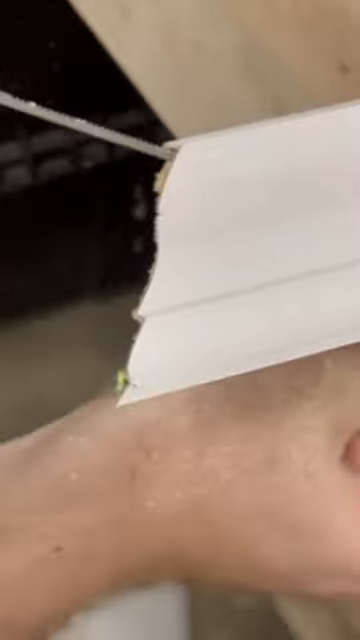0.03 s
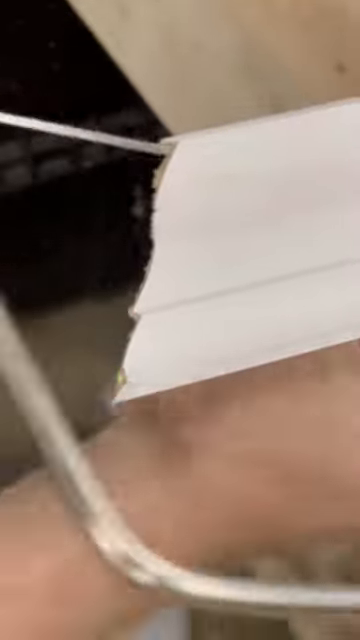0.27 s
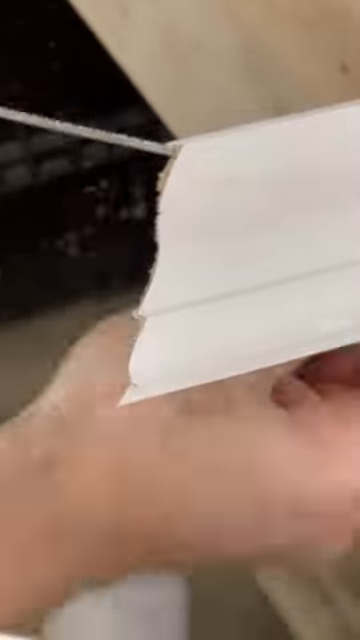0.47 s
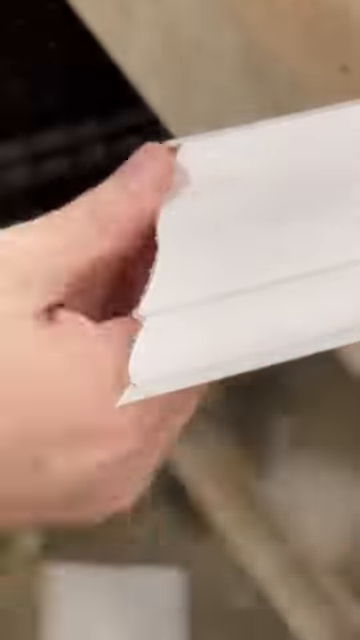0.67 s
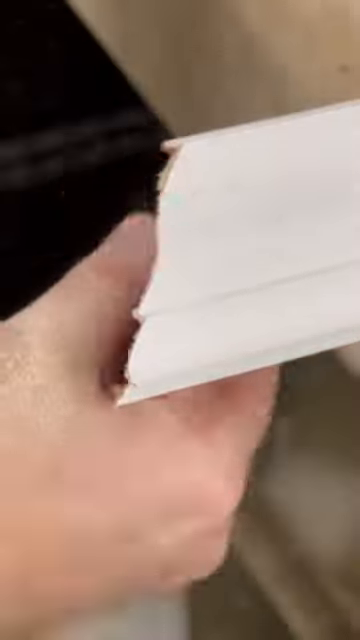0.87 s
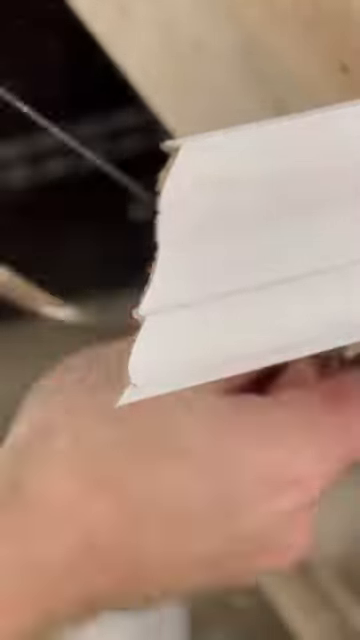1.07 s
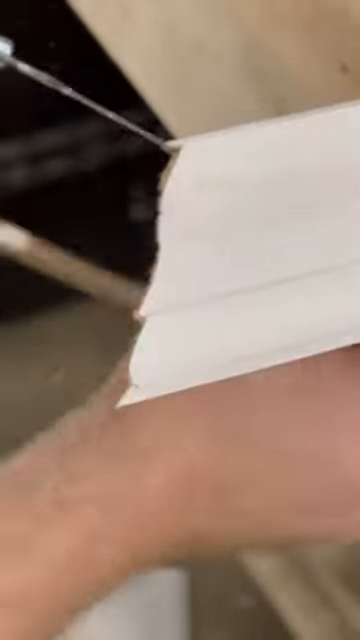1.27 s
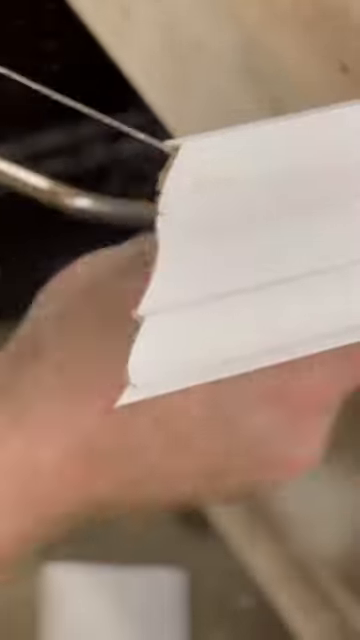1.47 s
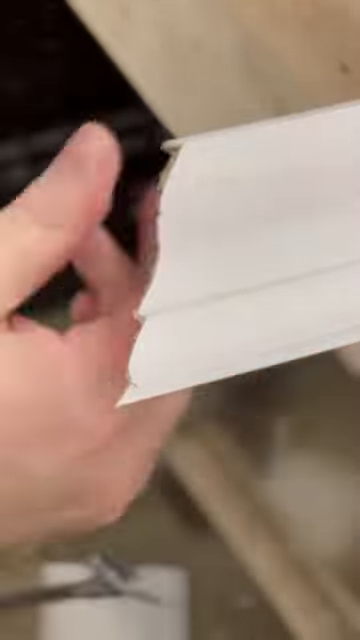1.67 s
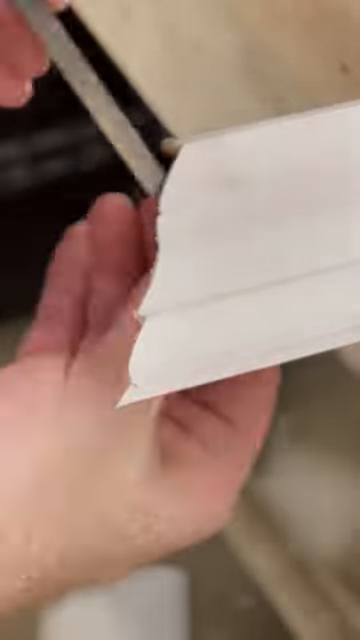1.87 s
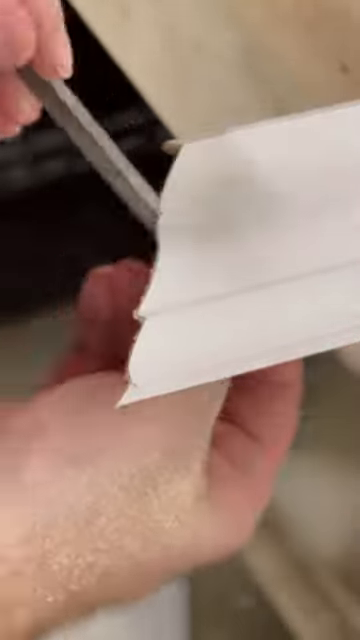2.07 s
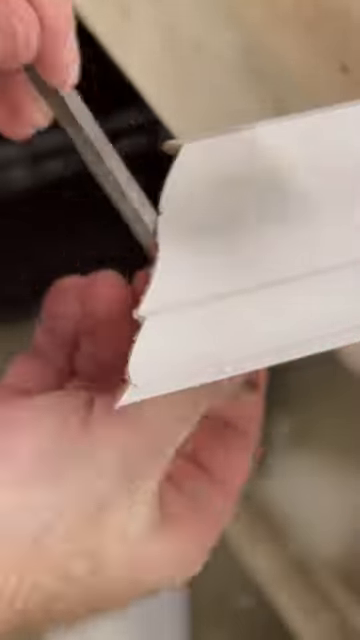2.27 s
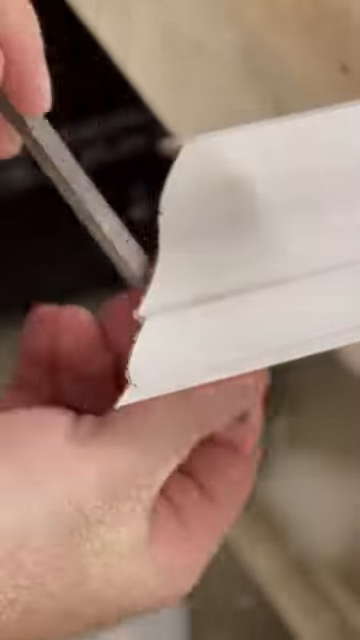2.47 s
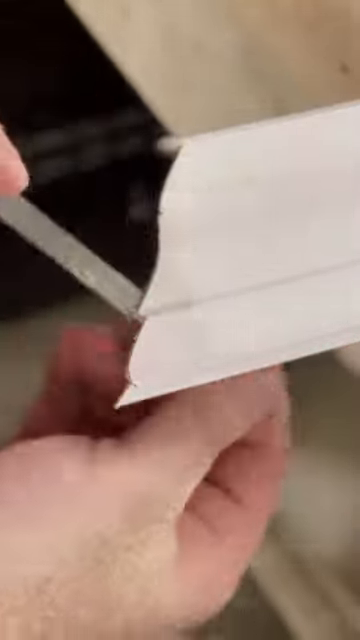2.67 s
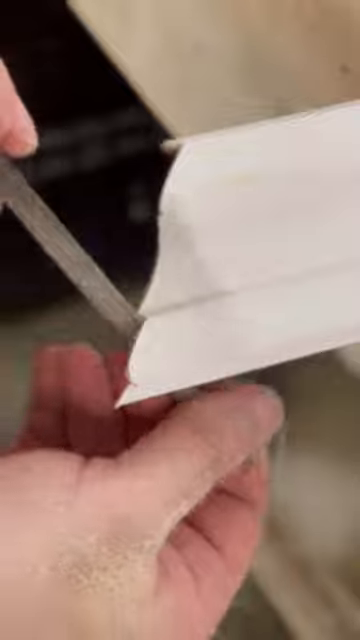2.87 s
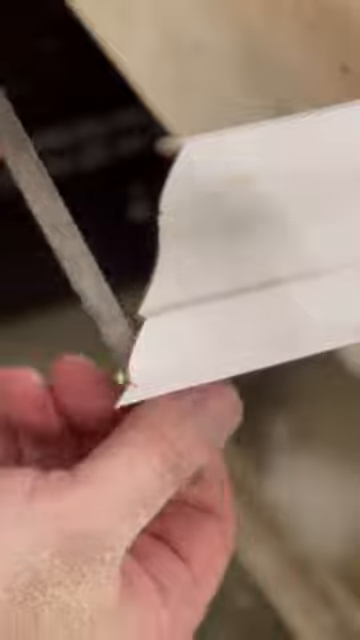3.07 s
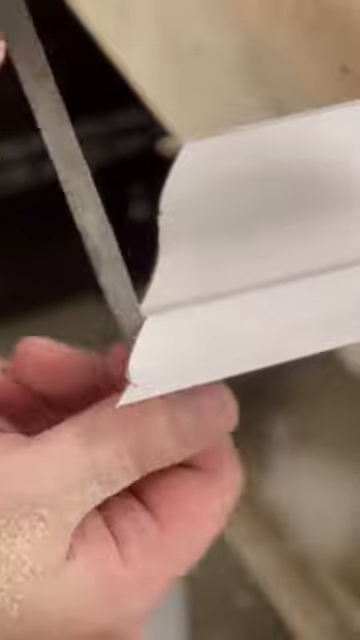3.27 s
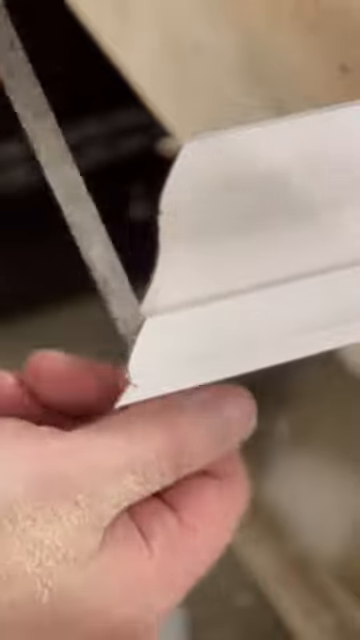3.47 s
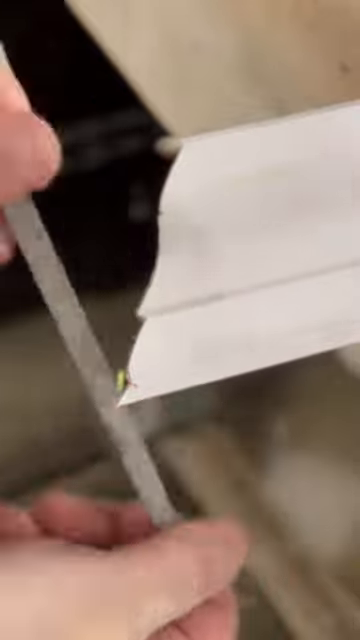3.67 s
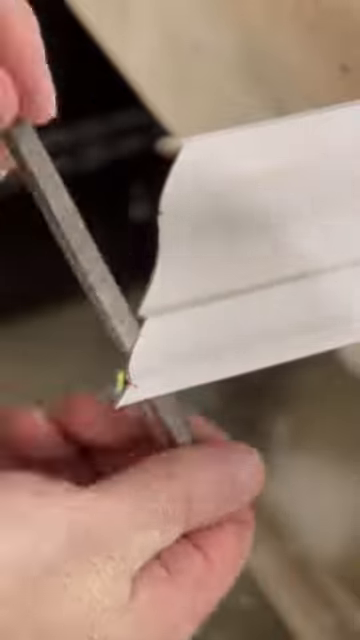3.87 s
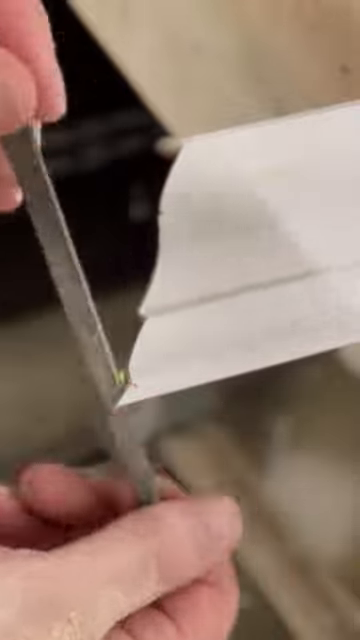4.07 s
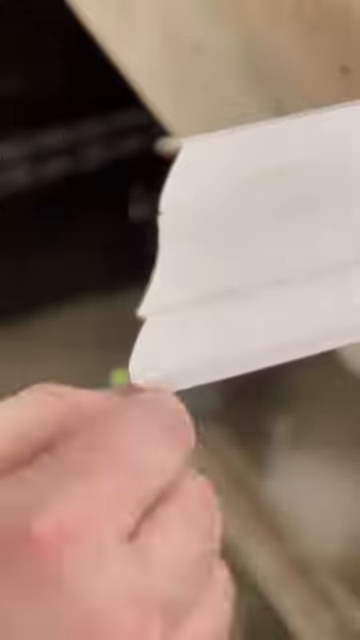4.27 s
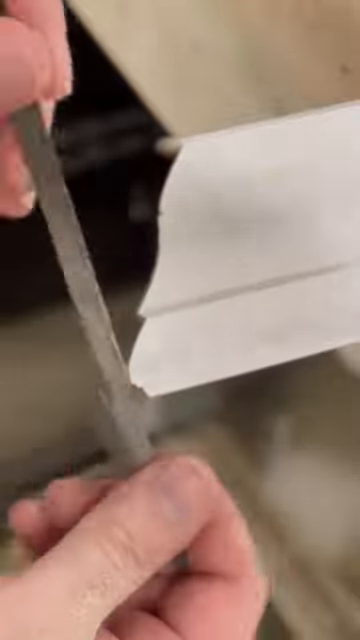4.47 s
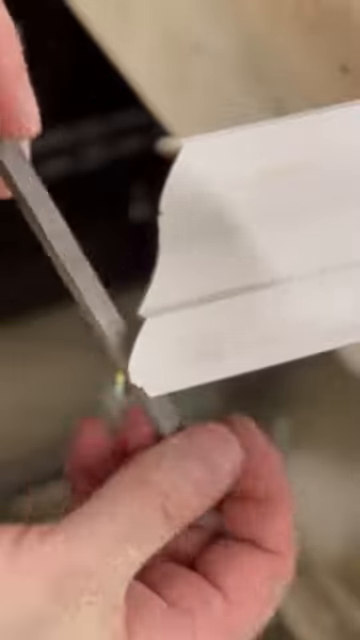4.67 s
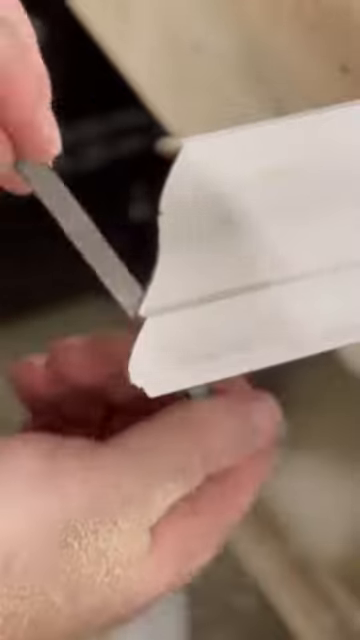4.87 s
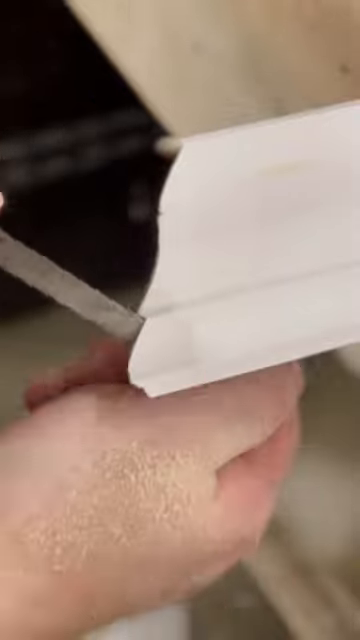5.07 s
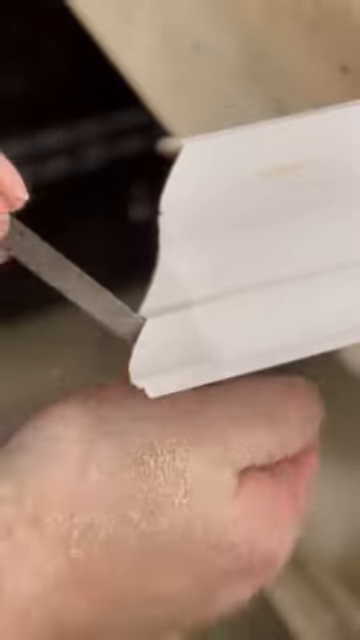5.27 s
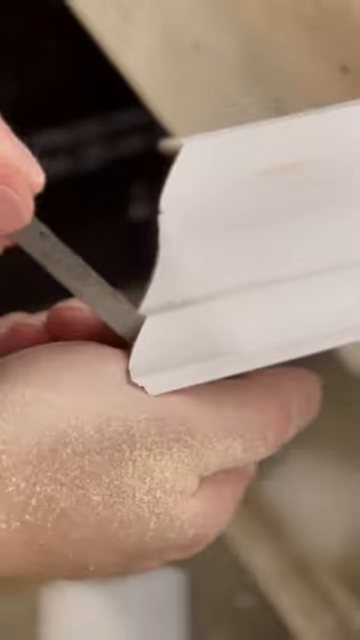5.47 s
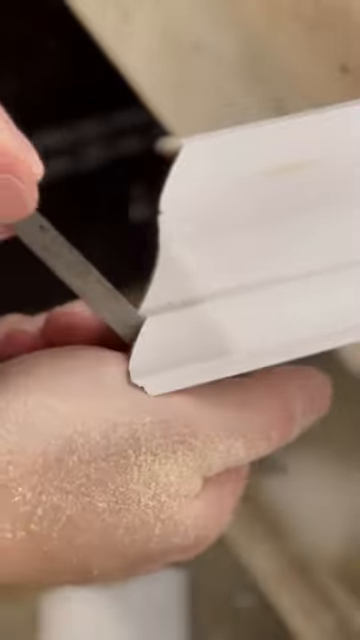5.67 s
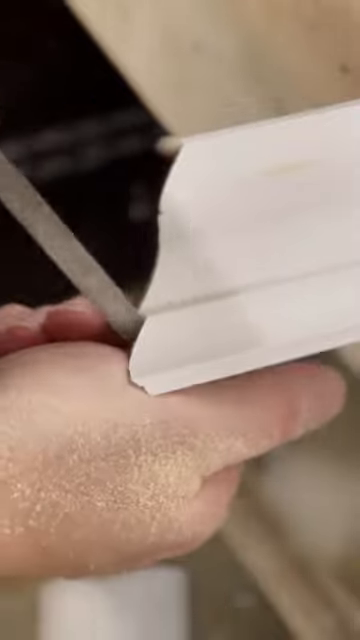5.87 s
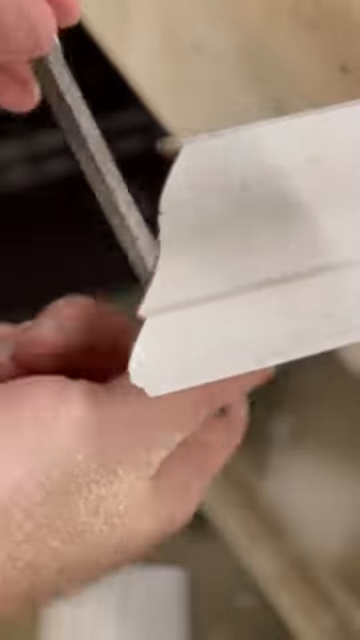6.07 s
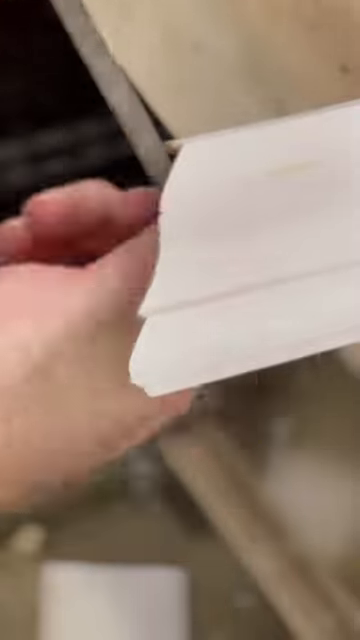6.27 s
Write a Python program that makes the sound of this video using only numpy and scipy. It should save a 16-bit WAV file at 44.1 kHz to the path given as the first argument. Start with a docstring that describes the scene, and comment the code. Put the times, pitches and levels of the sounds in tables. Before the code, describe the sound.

Very fast, quiet saw strokes rasp on wood, an offcut snaps, then a click, a fan's rush and much louder, rapid, irregular filing.

```python
"""Close to a phone in a quiet workshop, a coping saw works the end of a wooden moulding, in a time-lapse,
sped up with its pitch kept, so that the strokes follow one another very quickly. An offcut snaps off, fingers
brush the wood in a pause, and the saw bites again. Then a switch clicks, a fan starts to blow and a file takes
over. Each bite is a short swell of rough noise that shakes the board's resonances; rubs and clicks are such
swells too. Room and fan are steady noise, shaped by pitch."""
import sys
import numpy as np
from scipy.fft import rfft, irfft, next_fast_len
from scipy.io import wavfile
from scipy.ndimage import uniform_filter1d

SR = 44100
rng = np.random.default_rng(int(sys.argv[2]) if len(sys.argv) > 2 else 0)


def bounce(signal):
    """Save signal as a 16-bit WAV file at the path given by the first command-line argument."""
    frames = np.transpose(np.atleast_2d(signal))
    limited = np.clip(frames, -1, 1)
    pcm = np.round(limited * 32767).astype(np.int16)
    wavfile.write(sys.argv[1], SR, pcm)


N = 278712


def amp(db):
    """Turns decibels into gain."""
    return 10 ** (np.asarray(db) / 20)


def unit(x):
    """Scales each row to an rms of 1."""
    return x / np.sqrt(np.mean(x ** 2, axis=-1, keepdims=True) + 1e-20)


def along(points, hz):
    """Reads a curve of (frequency [Hz], value) points on a log frequency axis."""
    f, v = np.transpose(points)
    return np.interp(np.log(hz + 1), np.log(f + 1), v)


def level(rows):
    """Gain per sample of a (time [s], level [dB]) curve, practically silent outside it."""
    s, db = np.transpose(rows)
    return amp(np.interp(np.arange(N) / SR, s, db, left=-150, right=-150))


def filtered(x, response):
    """Filters x by a complex response of frequency."""
    n = x.shape[-1]
    padded = next_fast_len(n + 8192)
    spectrum = rfft(x, padded) * response(np.fft.rfftfreq(padded, 1 / SR))
    return irfft(spectrum, padded)[..., :n]


def modes(table):
    """Response of ringing resonances (frequency [Hz], width [Hz], level [dB]), with alternating signs."""
    def response(f):
        total = 0
        for k, (centre, width, db) in enumerate(table):
            resonance = 1j * f * width / (centre * centre - f * f + 1j * f * width)
            total = total + (-1) ** k * amp(db) * resonance
        return total
    return response


def confined(table):
    """A group of modes radiates poorly well below its lowest and above its highest member."""
    low, high = table[0][0] / 2, table[-1][0] * 2
    return lambda f: (1j * f / (low + 1j * f) * high / (high + 1j * f)) ** 2


def grit(shape, spread_db):
    """Noise whose samples differ widely in size, as when fibres tear."""
    draw = rng.random(shape + (2,))
    size = amp(-max(spread_db, 0) * np.log(draw[..., 1] + 1e-4))
    return (draw[..., 0] - .5) * size


RELEASE = 1.35  # a catch lets go this much faster than it would relax by itself


def bursts(times, swell, parts, spread_db, skirt_db):
    """Rough swells set groups of modes ringing; each group's loudest moment gets the peak level asked for.

    parts: (modes, peak [dB], build-up [s], lean to higher modes [dB per octave], extra rub [dB])
    """
    t = np.arange(SR // 5) / SR
    width = np.clip(swell, .001, .025)[:, None]
    since = t - .08  # time from the peak of the swell

    def swelling(u):
        """Starts at u = -1, peaks at 0 and dies away."""
        return np.clip(1 + u, 0, None) ** 3 * np.exp(-3 * u)

    tearing = grit((len(times), len(t)), spread_db)
    catch = swelling(since * np.where(since > 0, RELEASE, 1) / (1.98 * width)) * tearing
    # a light rub leads into and out of each catch
    rub = amp(skirt_db) * swelling((since - .0056) / 0.024) * tearing
    out = np.zeros(N + SR)
    for table, db, build_s, lean, rub_db in parts:
        # each contact point favours different modes
        favour = amp(3.46 * rng.standard_normal((len(times), len(table))))
        octaves = np.log2([m[0] for m in table])
        favour = favour * amp(np.outer(lean, octaves - octaves.mean()))

        def response(f):
            each = np.array([(-1) ** k * modes([m])(f) for k, m in enumerate(table)])
            return confined(table)(f) * (favour @ each)

        ring = filtered(catch + amp(rub_db) * rub, response)
        # loudness over about 6 ms
        loudest = np.sqrt(uniform_filter1d(ring ** 2, size=260).max(axis=1))
        sound = ring * (amp(db) / loudest)[:, None]
        at = np.round((times - build_s) * SR).astype(int)[:, None] + np.arange(len(t))
        # half a second of spare room lets bursts begin before time zero
        at = at + SR // 2 - round(.08 * SR)
        out += np.bincount(at.ravel(), sound.ravel(), 2 * SR + N)[SR // 2:][:N + SR]
    return out[:N]


# How alike diffuse sound is on the left and right: (frequency [Hz], likeness [-1 to 1])
ALIKE = [(150, .99), (640, .5), (1400, .8), (2200, 1), (5800, 1), (8500, -.3), (10500, -1)]


def diffuse(x):
    """Mixes two unrelated signals into a stereo pair that is more or less alike at each frequency."""
    def mid_and_side(hz):
        turn = np.arccos(np.clip(along(ALIKE, hz), -1, 1)) / 2
        return np.array([np.cos(turn), np.sin(turn)])
    mid, side = filtered(x, mid_and_side)
    return np.array([mid + side, mid - side])


def rush(spectrum):
    """Steady stereo noise at rms 1, shaped by a (frequency [Hz], density [dB per Hz]) curve."""
    noise = rng.standard_normal((2, N))
    return unit(diffuse(filtered(noise, lambda hz: amp(along(spectrum, hz)))))


# Colour of the quiet room with a faint drone: (frequency [Hz], relative density [dB per Hz])
SHOP = [(20, 1), (90, -1.5), (320, -18.5), (355, -11), (395, -22), (1600, -26), (2200, -36), (15000, -53)]
SHOP_DB = -58


def room():
    """The room's low rumble is noise that is strongest at the bottom."""
    return amp(SHOP_DB) * rush(SHOP)


# Resonances of the moulding, low to high, all (frequency [Hz], width [Hz], relative level [dB])
BEND = [(158.7, 31, 0.5), (231.3, 52.4, 13.5)]
TWIST = [(385.5, 102, 2), (533.7, 92, 7), (609, 130, 4), (924, 460, -13)]
EDGE = [(1311, 165, 14.4), (1750, 400, 1.75)]
SCRATCH = [(2186, 380, 10), (2623, 370, 6.5), (3335, 252, 8), (5100, 325, -1.5), (6100, 3600, -10),
           (7500, 1060, -5), (9600, 6300, -23.5), (13300, 4600, -26)]
# Hiss of the thin blade's teeth: (frequency [Hz], width [Hz], relative level [dB])
BLADE = [(7600, 64000, 0)]
# Blade sliding in the cut: (time [s], level [dB])
DRAG = [(0, -37.5), (.07, -54.5), (.135, -66), (.17, -44.5), (.38, -42), (.405, -64), (.45, -41),
        (.58, -59), (.62, -100), (1.23, -100), (1.26, -47.5), (1.385, -62), (1.41, -44.5), (1.48, -50.5),
        (1.5, -51.5), (1.53, -49.5), (1.6, -54.5), (1.62, -90)]


def drag():
    """The blade slides over the fibres and excites the whole board."""
    force = grit((N,), spread_db=3.0)
    groups = [(BEND, -4), (TWIST[1:], -4), (EDGE, -8), (SCRATCH, -5), (BLADE, -15)]
    ringing = sum(amp(db) * unit(filtered(force, modes(table))) for table, db in groups)
    return level(DRAG) * unit(ringing)


# The saw's stroke rocks the bench: (frequency [Hz], width [Hz], relative level [dB])
FRAME = [(99, 37, 0)]
# Bites of the teeth: (time [s], strength [dB], edge ring over the board [dB], swell [s], about half the rise)
BITES = [(0.023, -35.5, -12.5, 0.0054), (0.055, -46.5, -8, 0.0078), (0.092, -41.5, -11.5, 0.0048),
         (0.178, -36, -15, 0.015), (0.218, -35.5, -14.5, 0.0041), (0.255, -34.5, -13, 0.01),
         (0.303, -35, -14.5, 0.0051), (0.336, -33.5, -9, 0.0036), (0.371, -35, -12.5, 0.0032),
         (0.417, -40, -13, 0.0018), (0.449, -36, -15, 0.0034), (0.491, -32, -17, 0.0041),
         (0.51, -32.5, -18, 0.015), (0.558, -45.5, -1.5, 0.0011), (1.267, -29.5, -15, 0.008),
         (1.322, -33.0, -20, 0.021), (1.405, -29, -8.5, 0.0028), (1.451, -32, -17, 0.011),
         (1.529, -27, -18, 0.0097), (1.556, -41, -14, 0.002), (1.59, -41.5, -14, 0.0027),
         (1.673, -26, -21.5, 0.0047), (2.01, -18.5, -16.5, 0.0066), (2.039, -18.5, -19.5, 0.0094),
         (2.067, -18, -16.5, 0.01), (2.11, -26.5, -14, 0.0086), (2.157, -29, -9.5, 0.0075),
         (2.184, -20.5, -20.5, 0.0072), (2.206, -14.5, -16, 0.0024), (2.241, -16.0, -15, 0.0024),
         (2.276, -27, -16, 0.0044), (2.303, -26.5, -10.5, 0.0085), (2.358, -23.5, -14.5, 0.0025),
         (2.379, -23.5, -11.5, 0.0079), (2.424, -21.5, -13, 0.0098), (2.463, -15.5, -8, 0.0061),
         (2.507, -35, -6, 0.0073), (2.565, -32, -13, 0.0045), (2.614, -26, -4, 0.019),
         (2.637, -17, -14, 0.001), (2.663, -28, -11, 0.0023), (2.765, -30.5, -7, 0.034),
         (2.786, -22, -9.5, 0.0018), (2.856, -24.5, -19, 0.0065), (2.889, -22, -17.5, 0.0045),
         (2.917, -19.5, -11.5, 0.009), (2.985, -13.5, -14.5, 0.0066), (3.008, -21, -7.5, 0.0093),
         (3.052, -28, -12.5, 0.0032), (3.108, -15.5, -7, 0.0086), (3.415, -25.5, -1.5, 0.0035),
         (3.425, -18, 7, 0.0026), (3.441, -33.5, -8, 0.0024), (3.57, -16.5, -7, 0.0096),
         (3.716, -18.5, 0, 0.0016), (3.727, -23.5, 9.5, 0.0071), (3.754, -40, -3, 0.004),
         (3.795, -28.5, -2, 0.0028), (3.81, -21, -4, 0.0068), (3.85, -37, -15.5, 0.0073),
         (3.916, -35, -15.5, 0.0044), (3.936, -25.5, -10.5, 0.011), (3.982, -20, -17.5, 0.0096),
         (4.017, -27, -21.5, 0.012), (4.051, -24, -43, 0.006), (4.101, -32, -26.5, 0.0054),
         (4.12, -20, -11, 0.0065), (4.239, -51, 1.5, 0.0053), (4.378, -19, -17, 0.0057),
         (4.551, -15.5, 1, 0.0038), (4.597, -18.5, -9.5, 0.016), (4.621, -34, -10, 0.01),
         (4.668, -18.5, -7, 0.0051), (4.69, -17, -11, 0.0056), (4.716, -20.5, -12, 0.004),
         (4.822, -23.0, -16.5, 0.011), (4.857, -33, -10, 0.0011), (4.89, -27, -16, 0.0025),
         (4.925, -25.5, -10.5, 0.015), (5.05, -20, -14, 0.0015), (5.064, -19, -3.5, 0.0042),
         (5.239, -22.0, -8.5, 0.018), (5.272, -21.5, -6.5, 0.01), (5.352, -32.5, -8.5, 0.0052),
         (5.372, -22.5, -9.5, 0.008), (5.414, -29.5, -14.5, 0.0074), (5.457, -18.5, -18, 0.0075),
         (5.48, -37, 10.5, 0.0061), (5.509, -33, -1.5, 0.01), (5.524, -23.5, -13.5, 0.0074),
         (5.539, -17.5, -13, 0.0033), (5.576, -19, -6.5, 0.013), (5.653, -20.5, -11, 0.012),
         (5.677, -26.5, 3.5, 0.0081), (5.699, -19.5, -19.5, 0.021), (5.713, -20.5, -1.5, 0.0038),
         (5.726, -23, -23, 0.0032), (5.774, -26.5, -9, 0.015), (5.792, -33, 10, 0.0064),
         (5.814, -23.5, 3.5, 0.0038), (5.831, -17, -1.5, 0.0058), (5.851, -25, 4.5, 0.0047),
         (5.886, -26, 3, 0.013), (5.936, -22, 3, 0.0075), (5.965, -30, -6.5, 0.0011),
         (6.051, -22.5, -7, 0.0097), (6.099, -28, -4, 0.013), (6.141, -20.5, -10, 0.0094),
         (6.166, -17.5, -12.5, 0.0033), (6.221, -25.5, -13.5, 0.0055), (6.257, -17, -13, 0.0057),
         (6.291, -27.5, -23.5, 0.008)]
# The tool moves along the cut: (time [s], twist over bend [dB], lean to the higher twist modes [dB per octave],
# the same lean for edge modes [dB per octave], treble scratch gain [dB])
CONTACT = [(0, -3.5, 5, 11, 0.5), (.55, -9, 11, 8, -1.5), (1.3, -6.5, -13.5, 9, -0.5), (2, 2, 5.5, 1, 2),
           (2.4, -3, 2.5, 0, -1.5), (2.65, 3, 6.5, -8.5, -1.5), (3.1, -3.5, -16, -3, -0.5),
           (3.45, 0, 6, 2.5, 5), (3.8, -2.5, -10.5, -7, -2.5), (4.4, -0.5, -14, -5, 8.5),
           (4.6, -1, -6.5, 10, -3), (4.95, -4, -12.5, -30, -4), (5.3, 3, 3, 20, -2), (5.6, 5, 2.5, 15, 0.7),
           (5.82, 0, 5, 22, -4), (5.86, 9, -1, -22.5, 0.5), (5.95, 11, 10, -25, -5.5),
           (6.3, -10, -5.5, 17, 2)]
FILE_S = 1.9  # bites from this time on [s] are the file's
# scratch over the board [dB]; dB gained per dB of edge ring; dB lost per dB of strength
SAW_SCRATCH_DB, SAW_FOLLOWS_EDGE, SAW_DULLS = 3, 0.85, 0.13
FILE_SCRATCH_DB, FILE_FOLLOWS_EDGE, FILE_DULLS = -9, 0.9, 0.18
FIRM_DB = -25  # strength of an ordinary bite
RING_DARKENS = 0.28  # the file's scratch loses this many dB per octave per dB of edge ring
RUB_BRIGHT_DB = 1.5  # the rub around a catch scratches more than it shakes the board


def bites():
    """Teeth catch for a few ms and shake the board; its low resonances take longer to build up."""
    s, strength, ring, swell = np.transpose(BITES)
    saw, rasp = s < FILE_S, s >= FILE_S
    when, *controls = np.transpose(CONTACT)
    over_db, twist_lean, edge_lean, treble_db = (np.interp(s, when, c) for c in controls)
    # bend and twist share the strength of the bite
    bend = strength - 10 * np.log10(1 + amp(over_db) ** 2)
    twist, edge = bend + over_db, strength + ring
    firm = strength - FIRM_DB
    saw_scratch = SAW_SCRATCH_DB + SAW_FOLLOWS_EDGE * ring - SAW_DULLS * firm
    file_scratch = FILE_SCRATCH_DB + FILE_FOLLOWS_EDGE * ring - FILE_DULLS * firm
    scratch = strength + treble_db + np.where(saw, saw_scratch, file_scratch)
    scratch_lean = np.where(saw, 0, -RING_DARKENS * (ring + 10))

    def board(k, twists):
        return [(BEND, bend[k], .005, 0, 0),
                (twists, twist[k], .003, twist_lean[k], 0),
                (EDGE, edge[k], .0015, edge_lean[k], 0),
                (SCRATCH, scratch[k], 0, scratch_lean[k], RUB_BRIGHT_DB)]

    # held near the cut, the board loses its lowest twist while the saw works
    sawing = board(saw, TWIST[1:])
    sawing += [(FRAME, bend[saw] - 12, .005, 0, 0), (BLADE, scratch[saw] - 10, 0, 0, RUB_BRIGHT_DB)]
    filing = board(rasp, TWIST)
    saw_sound = bursts(s[saw], swell[saw], sawing, spread_db=3.5, skirt_db=-14.0)
    file_sound = bursts(s[rasp], swell[rasp], filing, spread_db=3, skirt_db=-22.0)
    return saw_sound + file_sound


# Rubbing resonances: (frequency [Hz], width [Hz], relative level [dB])
SKIN = [(1620, 1300, 1.5), (5460, 8200, 5.5), (10600, 69000, 3.5)]
# The offcut's own ring: (frequency [Hz], width [Hz], relative level [dB])
SNAP_RING = [(1640, 360, 15.5), (2560, 430, -1), (4260, 230, 11.5)]
# Offcut breaking off, then fan switch: (time [s], reference level [dB], thud over it [dB])
SNAP = [(0.609, -29, -7), (1.7828, -33.5, 0)]


def snaps():
    """Hard clicks with a thud through the bench; the offcut rings far more than the switch."""
    s, db, thud = np.transpose(SNAP)
    # pairs of numbers are for the offcut and the switch
    parts = [(SNAP_RING, db + [-6, -30], 0, 0, 0),
             (SKIN, db + [-10, -5], 0, 0, 0),
             (BEND + TWIST, db + thud + 0.5, .002, 0, 0)]
    peak_s = s + 0.0031  # each swell peaks just after its listed time
    return bursts(peak_s, np.array([.005, .004]), parts, spread_db=-6.5, skirt_db=-16.5)


# Fingers and tool moving on the wood: (time [s], rub reference level [dB], thud level [dB],
# swell [s], about half the rise)
BRUSH = [(0.71, -64.5, -77, 0.0053), (0.745, -62.5, -61, 0.021), (0.893, -53, -84, 0.0038),
         (0.907, -66, -57, 0.004), (0.926, -58.5, -49.5, 0.0037), (1.02, -54, -58, 0.012),
         (1.051, -55.5, -55.5, 0.0056), (1.098, -63, -81, 0.025), (1.158, -67.5, -52, 0.0098),
         (1.216, -66, -52, 0.0071), (1.24, -57, -52, 0.0031), (1.63, -66, -44.5, 0.019)]


def brush():
    """Faint rubs and bumps while the work is shifted; they stir the board and rock the bench."""
    s, db, thud, swell = np.transpose(BRUSH)
    parts = [(SKIN, db - 1, 0, 0, 0),
             (SCRATCH, db - 8.5, 0, 0, RUB_BRIGHT_DB),
             (BEND + TWIST[1:], thud, .003, 0, 0),
             (FRAME, thud - 4, .005, 0, 0)]
    return bursts(s, swell, parts, spread_db=2.5, skirt_db=-17)


# Colour of the fan's rush: (frequency [Hz], relative density [dB per Hz])
FAN = [(35, -45), (60, -7), (162, 4.5), (282, -2.5), (355, -0.5), (469, -3), (1010, -8), (2700, -17),
       (7000, -30.5), (10900, -38.5), (15000, -58.5)]
FAN_DB, FAN_ON_S = -45, 1.795


def fan():
    """The fan's blowing is steady noise that comes up within 4.4 ms once it is switched on."""
    running = np.clip((np.arange(N) / SR - FAN_ON_S) / 0.0044, 0, 1)
    return amp(FAN_DB) * running * rush(FAN)


# The bench's echo, unlike at the two ports: (frequency [Hz], width [Hz], level [dB])
BENCH = [(430, 380, -18), (750, 370, -6.5), (1300, 276, -11.5), (8500, 2200, -12)]


def bench(x):
    """Echoes delayed differently at each frequency; they add at one port and subtract at the other."""
    delay_s = .012 * rng.random(300)  # one value every 80 Hz

    def scatter(f):
        delay = np.interp(f / 80, np.arange(300), delay_s)
        # delay summed over frequency gives phase
        return np.exp(-2j * np.pi * np.cumsum(delay) * f[1])

    echo = filtered(x, lambda f: scatter(f) * modes(BENCH)(f))
    return echo * np.array([[1], [-1]])


# Left port's phase lead over the right: (frequency [Hz], lead [rad])
LEAD = [(5800, -.05), (6500, -.9), (9560, -2.1), (11200, -3.05), (13600, -3.4), (15600, -4.7)]


def scene():
    """Near sounds reach the two ports with a phase gap that grows in the treble."""
    near = drag() + bites() + snaps() + brush()
    ports = filtered(near, lambda hz: np.exp(.5j * np.outer([1, -1], along(LEAD, hz))))
    return room() + ports + bench(near) + fan()


CEILING = .85  # where the phone's input rounds off
TOP_HZ = 15830


def record(dry):
    """The phone rounds off its loudest peaks and keeps nothing above its band limit."""
    rounded = dry / (1 + np.abs(dry / CEILING) ** 4) ** .25
    return filtered(rounded, lambda hz: hz < TOP_HZ)


dry = scene()
out = record(dry)
bounce(out)
```